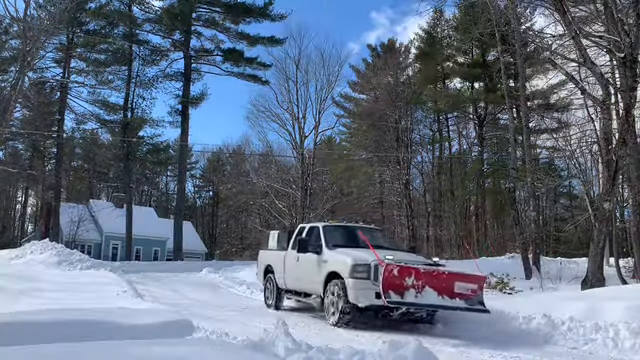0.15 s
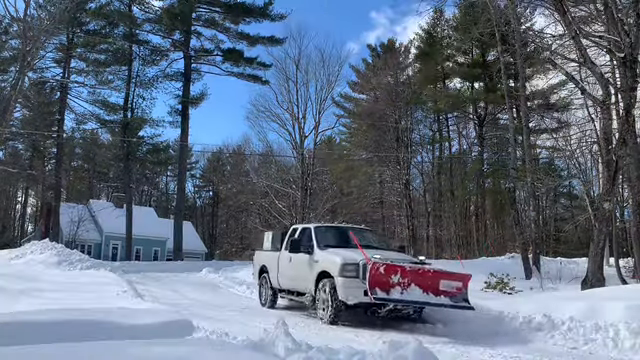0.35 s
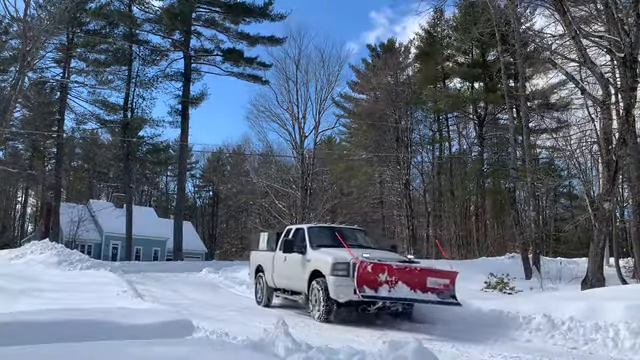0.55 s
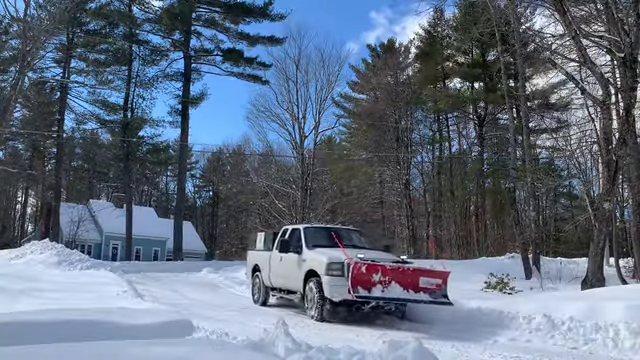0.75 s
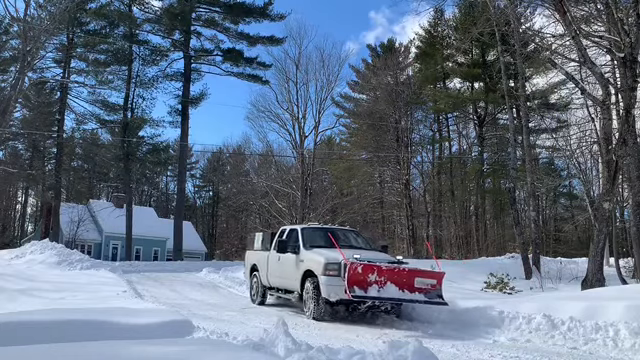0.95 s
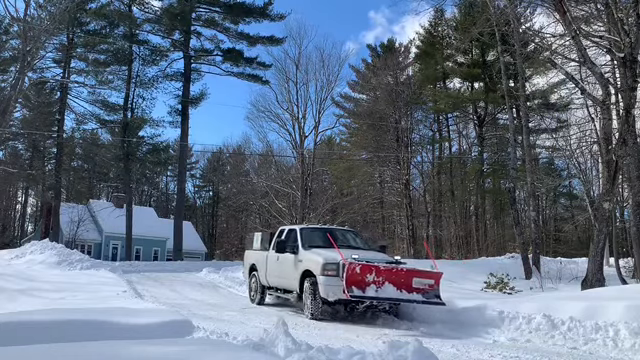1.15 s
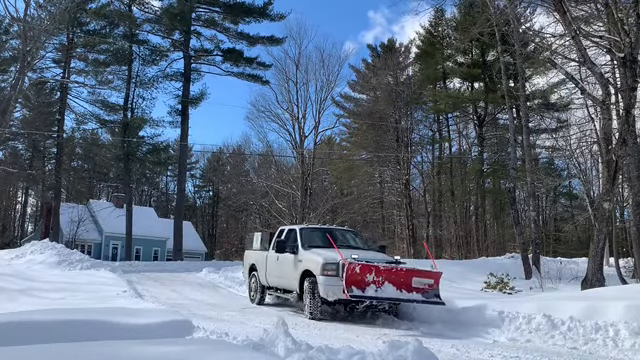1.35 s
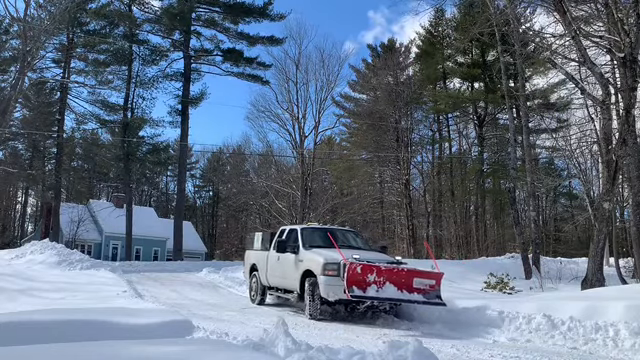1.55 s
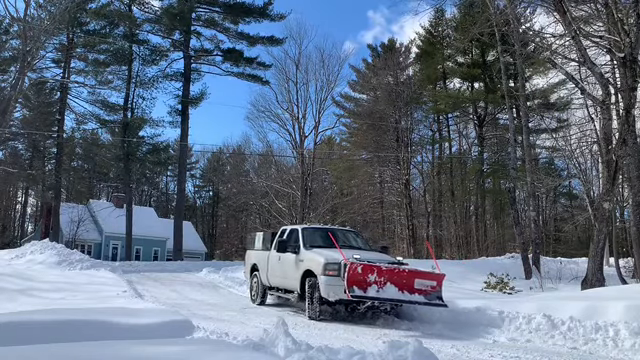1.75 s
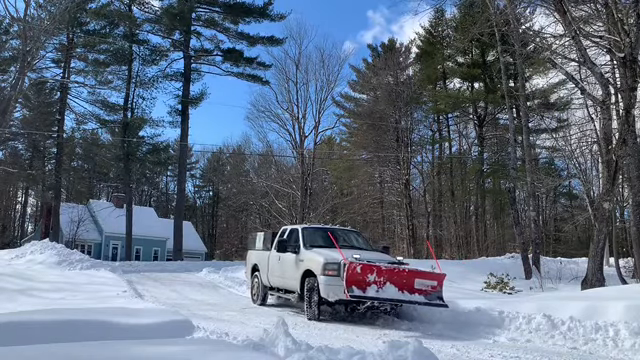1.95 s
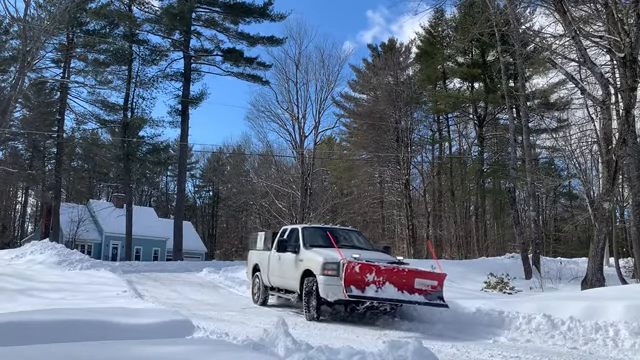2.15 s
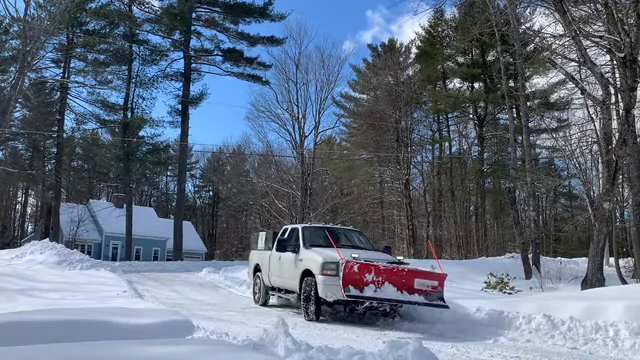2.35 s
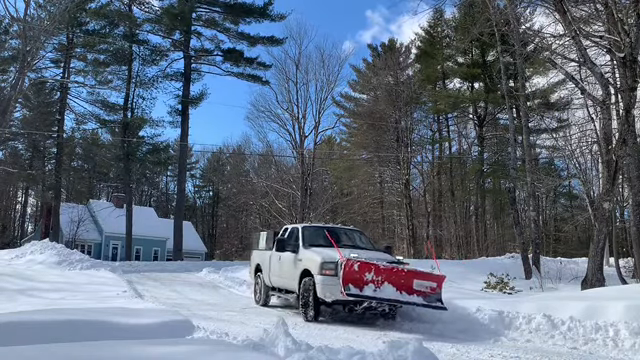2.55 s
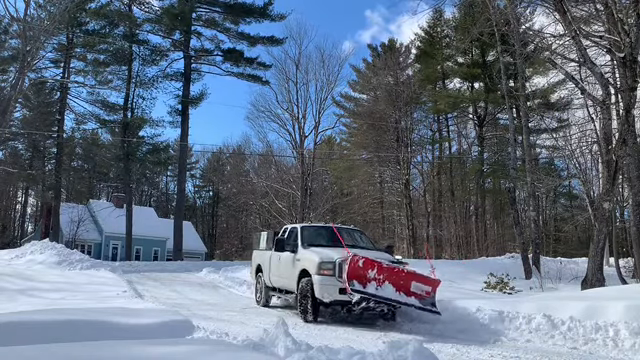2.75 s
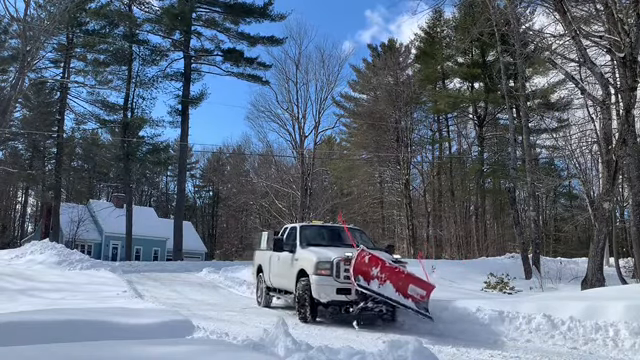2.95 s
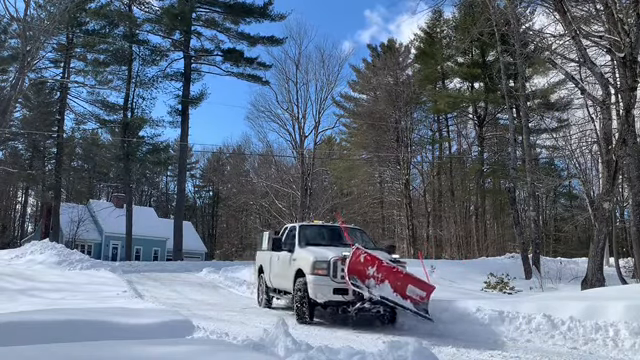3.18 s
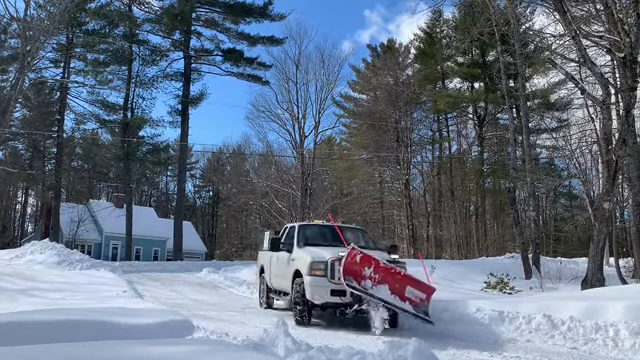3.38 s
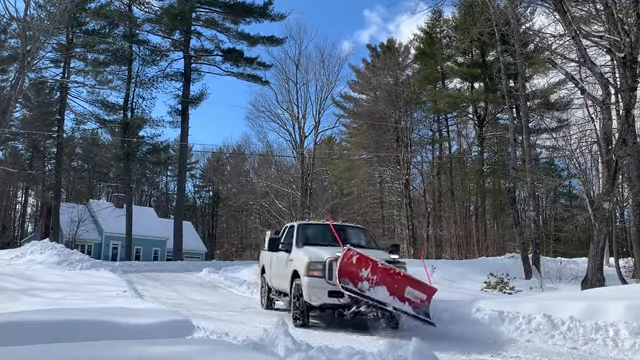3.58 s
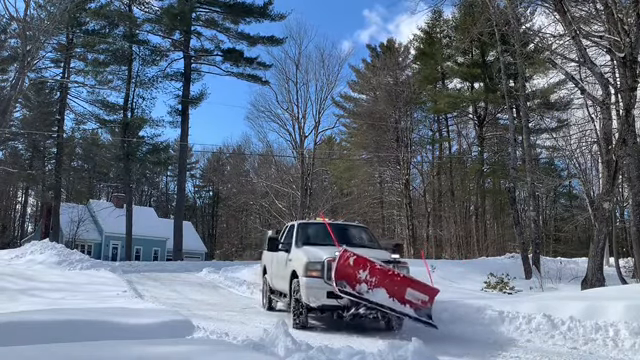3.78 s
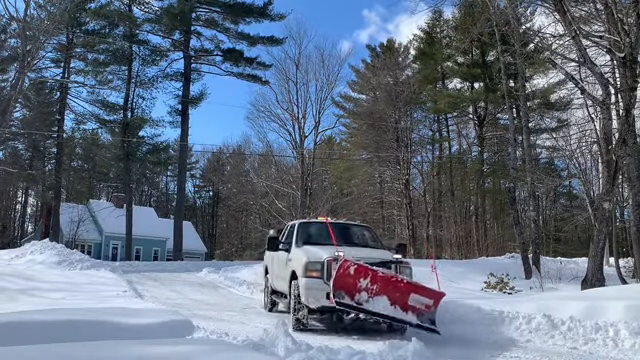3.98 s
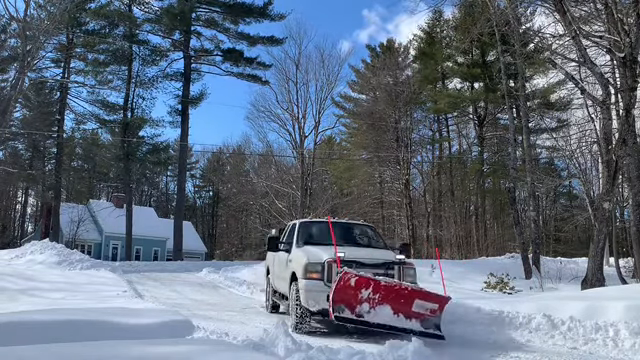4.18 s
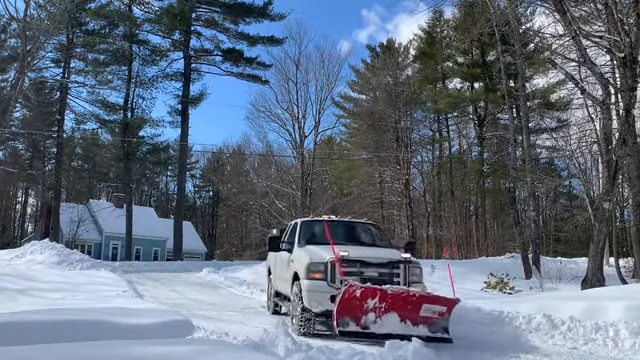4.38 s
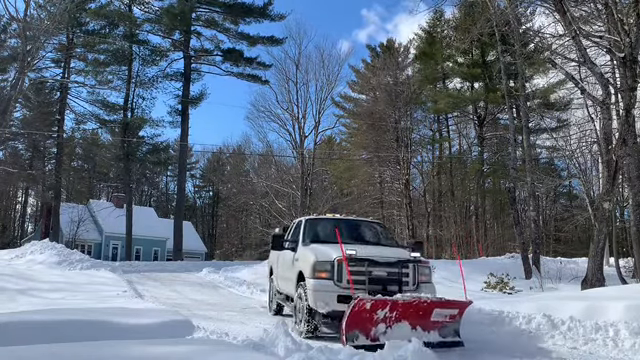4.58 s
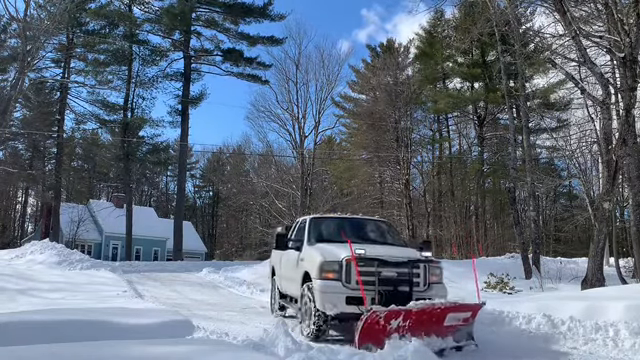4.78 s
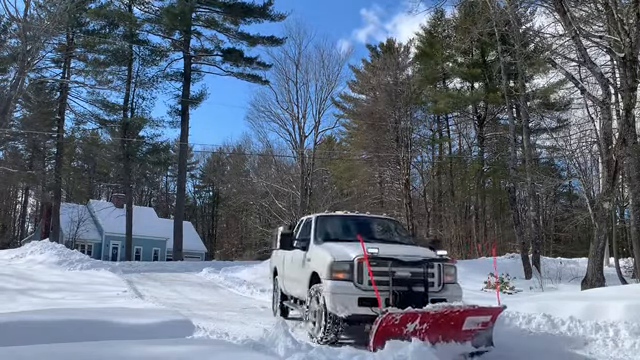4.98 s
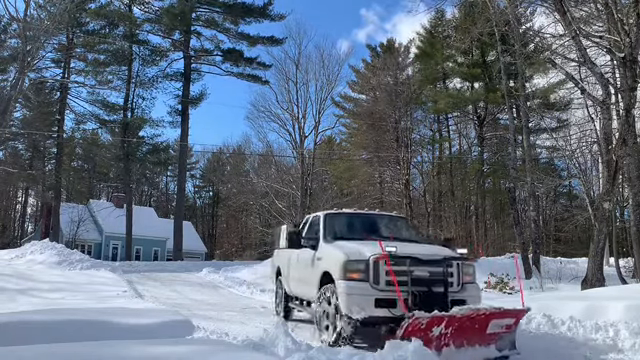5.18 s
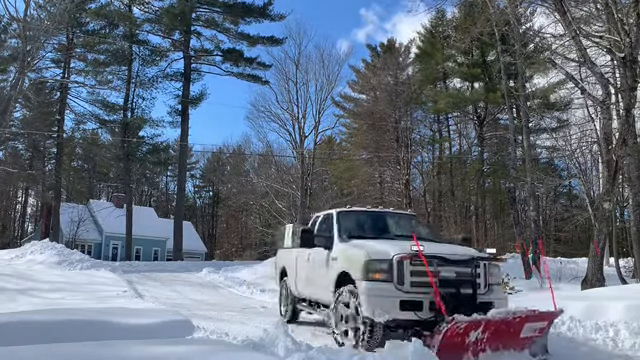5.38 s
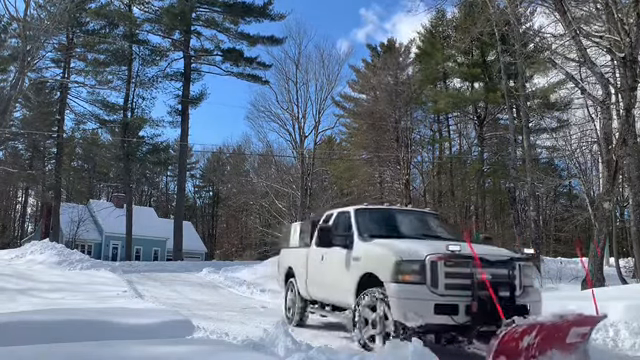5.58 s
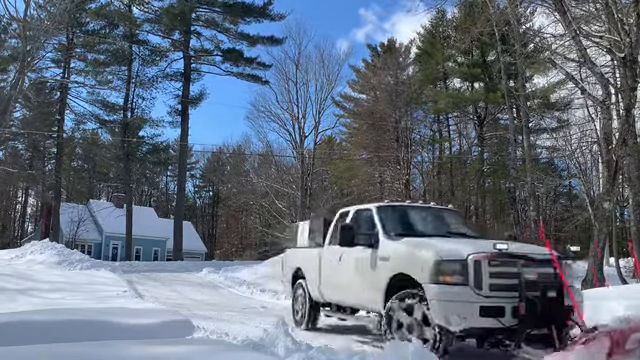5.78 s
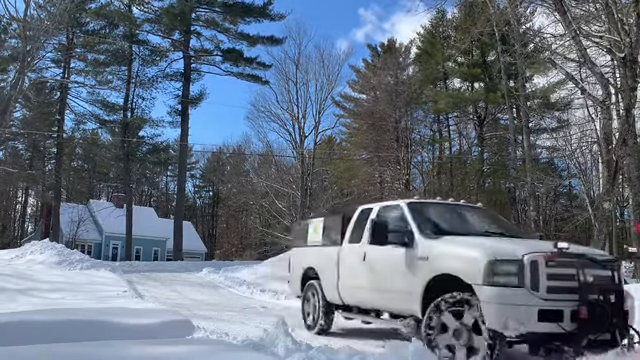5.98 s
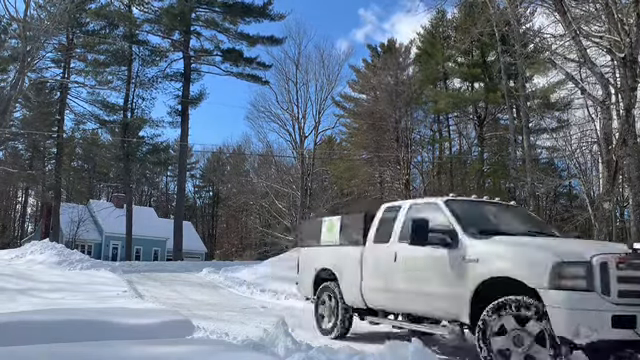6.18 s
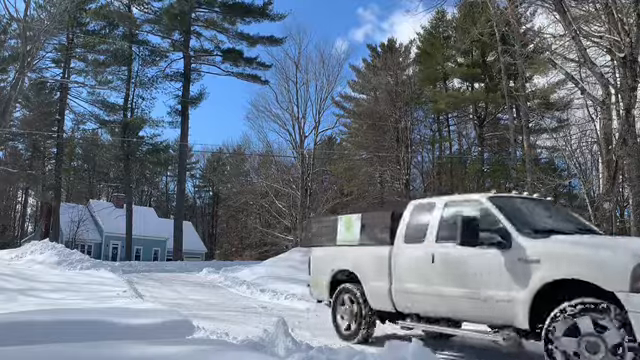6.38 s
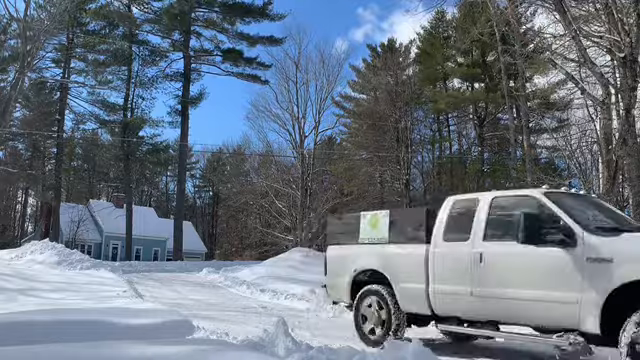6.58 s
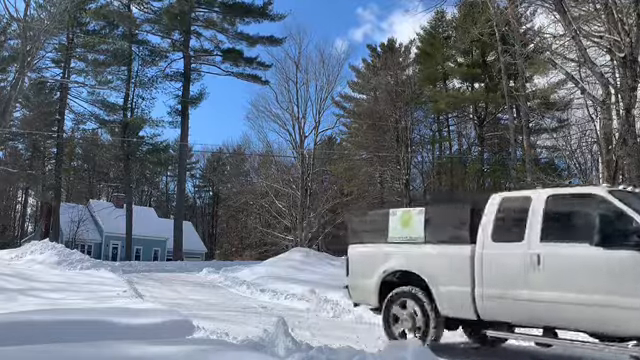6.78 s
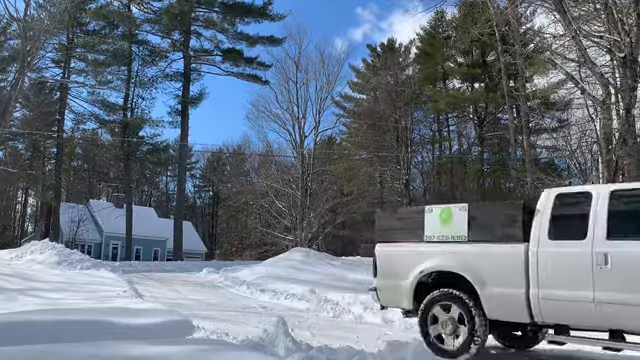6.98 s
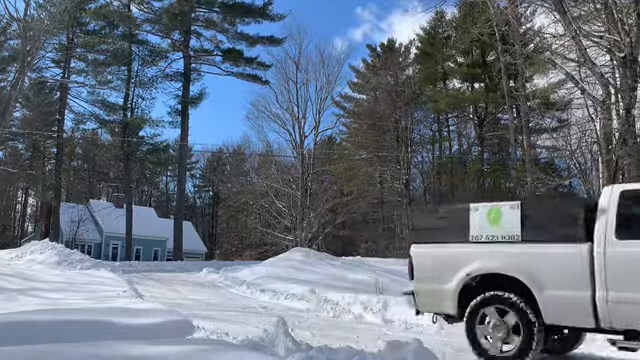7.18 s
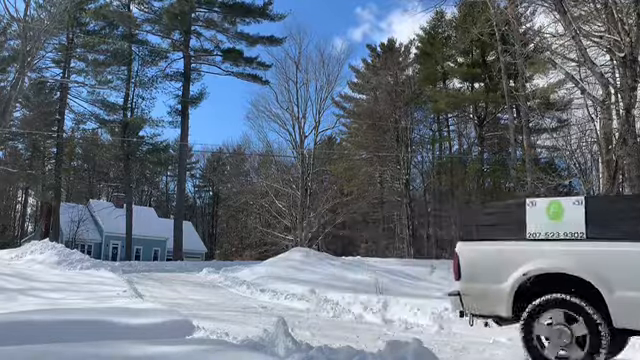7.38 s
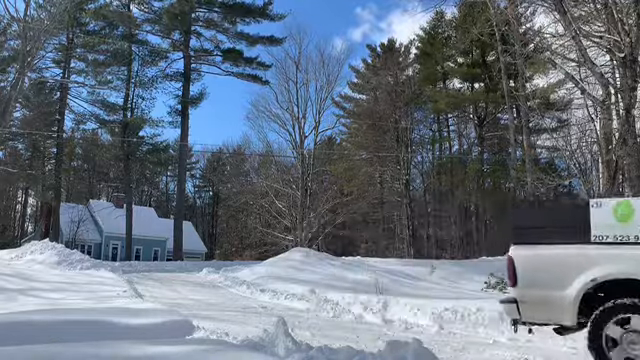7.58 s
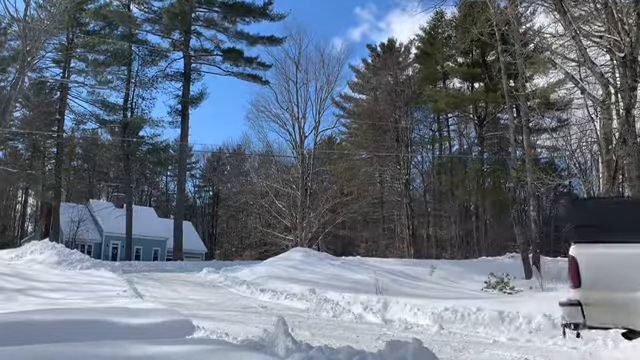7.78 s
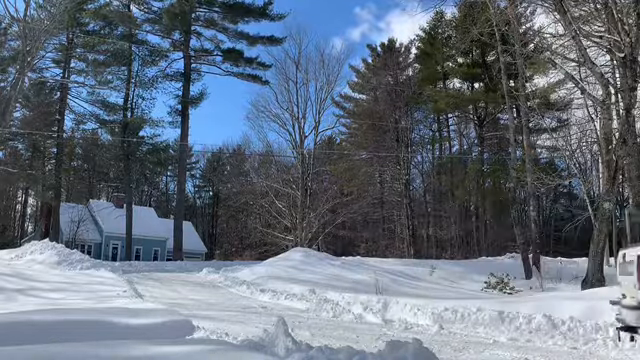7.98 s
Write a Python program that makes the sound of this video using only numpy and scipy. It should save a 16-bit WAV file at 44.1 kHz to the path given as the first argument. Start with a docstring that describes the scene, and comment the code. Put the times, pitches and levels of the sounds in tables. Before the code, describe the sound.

Burbling V8 truck engine, hydraulic plow whine and metal clanks, then a growling rev with scraping blade and breaking snow crust sweeping past rightward.

```python
"""A V8 pickup with a steel plow manoeuvres over packed snow, slows, then revs up and passes close on the right.
The exhaust is engine orders and gas noise ringing a pipe; fan and valve gear are shaped noise.
The plow's frame and blade are struck resonances; its hydraulic pump and relief valve are wavering sines.
Snow crunches, snaps and breaks in slabs, built from random grains and short pitched ticks.
Short rough squeaks and scrapes of snow and steel are resonant grains."""
import sys
import numpy as np
from scipy import signal
from scipy.fft import rfft, irfft
from scipy.io import wavfile
from scipy.ndimage import uniform_filter1d, map_coordinates

SR = 44100
rng = np.random.default_rng(int(sys.argv[2]) if len(sys.argv) > 2 else 0)


def generate_wav(sig):
    """Save sig (samples, or channels by samples) to the path in sys.argv[1] as 16-bit PCM at SR."""
    pcm = np.round(np.clip(np.atleast_2d(sig).T, -1, 1) * 32767).astype(np.int16)
    wavfile.write(sys.argv[1], SR, pcm)


N = 354563
TIME = np.arange(N) / SR  # s
BINS = np.maximum(np.fft.rfftfreq(16384, 1 / SR), 1)  # Hz


def undb(db):
    """Decibels to gain."""
    return 10 ** (np.asarray(db) / 20)


def curves(table):
    """Columns of a table, joined by straight lines in time."""
    s, *columns = np.transpose(table)
    return [np.interp(TIME, s, c) for c in columns]


def ramp(start_s, length_s):
    """Rise from 0 to 1 in a straight line."""
    return np.clip((TIME - start_s) / length_s, 0, 1)


def unit(x):
    """Scale to rms 1."""
    return x / np.sqrt(np.mean(x ** 2))


def steady(x, size=9001):
    """Scale to a running rms of 1; size in samples."""
    power = uniform_filter1d(uniform_filter1d(x ** 2, size), size // 2)
    return x / np.sqrt(power + 1e-12)


def shape(x, gain):
    """Causal minimum-phase filter with the given gain at BINS."""
    cepstrum = irfft(np.log(np.maximum(gain, 1e-5)))
    half = len(cepstrum) // 2
    cepstrum[1:half] *= 2
    cepstrum[half + 1:] = 0
    response = irfft(np.exp(rfft(cepstrum)))[:half]
    return signal.oaconvolve(x, response)[:len(x)]


def colour(points):
    """Gain from (Hz, dB) points, joined on a log frequency axis."""
    hz, db = np.transpose(points)
    return undb(np.interp(np.log(BINS), np.log(hz), db))


def resonances(modes):
    """Gain of overlapping (Hz, width Hz, dB) resonances, summed in power."""
    power = 0
    for hz, width_hz, db in modes:
        detuning = (BINS / hz - hz / BINS) * hz / width_hz
        power = power + undb(db) ** 2 / (1 + detuning ** 2)
    return np.sqrt(power)


def band(low_hz, high_hz, order=8):
    """Gain of a steep band-pass."""
    low_cut = 1 + (low_hz / BINS) ** (2 * order)
    high_cut = 1 + (BINS / high_hz) ** (2 * order)
    return 1 / np.sqrt(low_cut * high_cut)


def walk(rate_hz):
    """Random points joined by lines, rate_hz points per second, spread near 1."""
    return 1.2 * np.interp(TIME * rate_hz, np.arange(4096), rng.standard_normal(4096))


def grains(per_second, spread_db):
    """Random clicks, most small and a few large."""
    size = undb(spread_db * np.minimum(rng.exponential(size=N), 5))
    return unit((rng.random(N) < per_second / SR) * size * rng.standard_normal(N))


def fade(x, seconds):
    """Give each pulse an exponential tail."""
    return signal.lfilter([1], [1, -np.exp(-1 / (seconds * SR))], x)


def bursts(times_s, levels_db, lengths_s, holds_s, rise_s=0.00014):
    """Envelope of blows that each hold, then die by 60 dB in their own time."""
    power = np.zeros(N)
    for s, db, length, hold in np.broadcast(times_s, levels_db, lengths_s, holds_s):
        start = int(s * SR)
        age = TIME[:min(N - start, SR)]
        decay = undb(db - 60 * np.maximum(age - hold, 0) / max(length, .01))
        power[start:start + len(age)] += (decay * (1 - np.exp(-age / rise_s))) ** 2
    return np.sqrt(power)


def delay(x, ms):
    """Delay by a moving time."""
    return map_coordinates(x, [np.arange(N) - ms * SR / 1000], order=3, mode="nearest")


ECHO_TURN_S = 1.3  # half a turn of the blend of two echo patterns


def trees(x, t60_s=0.071):
    """Snow banks and trunks scatter a short, diffuse echo whose pattern shifts steadily."""
    age = TIME[:SR // 6]
    echoes = rng.standard_normal((2, len(age))) * undb(-60 * age / t60_s)
    first, second = (signal.oaconvolve(x, echo / np.linalg.norm(echo))[:N] for echo in echoes)
    turn = np.pi * TIME / ECHO_TURN_S
    return shape(first * np.cos(turn) + second * np.sin(turn), band(380, 6500, order=2))


# Bumps taken by the suspension. Each row: start in seconds, level in dB.
BUMPS = [(2.458, -25), (2.948, -24), (3.803, -25), (4.739, -20), (4.901, -22), (6.211, -26), (6.591, -18),
         (7.204, -15.5)]
THUMP_S = 0.39  # time to die by 60 dB


def suspension():
    """Bumps drum the truck's body: low noise bursts."""
    s, db = np.transpose(BUMPS)
    drum = steady(shape(rng.standard_normal(N), band(191, 321, order=5)), size=1501)
    return drum * bursts(s, db, THUMP_S, 0, rise_s=0.0041)


# Short rough squeaks and scrapes of snow and plow steel. Each row: centre in seconds, length in seconds,
# pitch in Hz, resonance width in Hz before squaring, level in dB.
SQUEAKS = [(0.3, 0.05, 2800, 2590, -56.5), (0.387, 0.052, 1550, 500, -52), (0.464, 0.05, 1500, 1500, -60),
           (0.557, 0.038, 1600, 900, -61), (0.672, 0.035, 4960, 2600, -51),
           (0.696, 0.052, 2180, 700, -52.5), (0.86, 0.027, 2000, 1800, -67), (1.245, 0.04, 3500, 4020, -59),
           (1.314, 0.086, 1370, 1500, -55), (2.475, 0.03, 4700, 1500, -45), (2.934, 0.043, 5400, 1500, -34),
           (5.656, 0.16, 6060, 800, -38.5), (5.83, 0.12, 5700, 710, -34), (6.11, 0.15, 5430, 510, -42.5)]


def squeaks():
    """Short rough squeaks and scrapes of snow and plow steel: resonant grains under a bell envelope."""
    out = np.zeros(N)
    for s, length_s, hz, width_hz, db in SQUEAKS:
        squeak = unit(shape(grains(1000, 2.5), resonances([(hz, width_hz, 0)]) ** 2))
        out += squeak * undb(db) * np.exp(-(2 * (TIME - s) / length_s) ** 2)
    return out


# Tone of the snow noise as heard. Each row: frequency in Hz, gain in dB.
SNOW_TONE = [(300, 0), (450, 4), (800, 3), (1080, -3), (1480, 5), (1850, -1), (2300, 3), (3500, 0),
             (6300, 1.5), (8300, -4), (11000, -1.5), (13500, -10), (16000, -8)]
# Grain sizes of packed snow. Each row: lowest Hz, highest Hz, grains per second.
GRAIN_SIZES = [(300, 1500, 350), (1500, 3200, 300), (3200, 6800, 600), (6800, 17000, 4500)]
CLUMP_DB, CLUMP_NEAR_DB = 1.2, .6  # unevenness at reference distance, added per halving of distance


def crunch(nearness):
    """Packed snow breaks in clumps of grains, each size flickering on its own."""
    clumps_db = (CLUMP_DB + CLUMP_NEAR_DB * nearness) * walk(22)
    out = np.zeros(N)
    for low_hz, high_hz, per_second in GRAIN_SIZES:
        envelope = fade(grains(per_second, 2.2) ** 2, .0006) ** .5
        crumbs = unit(envelope * rng.standard_normal(N))
        flicker = undb(clumps_db + 2.9 * walk(70))
        out += shape(crumbs * flicker, colour(SNOW_TONE) * band(low_hz, high_hz, order=4))
    return unit(out)


CRACKLES_PER_S, CRACKLE_S = 30, .004


def crackle():
    """Bits of frozen crust give way one by one, each with a short broad crack."""
    size = undb(3 * np.minimum(rng.exponential(size=N), 2.5))
    breaks = fade((rng.random(N) < CRACKLES_PER_S / SR) * size, CRACKLE_S)
    return unit(shape(breaks * rng.standard_normal(N), colour(SNOW_TONE) * band(550, 6500, order=2)))


SNAP_RING_S, SNAP_SPREAD_DB = .0026, 2.6


def snaps(per_second, low_hz, high_hz, ring_s=SNAP_RING_S):
    """Lumps of cold snow snap with brief decaying sines, each at its own pitch."""
    when, pitch, size = rng.random((int(per_second * TIME[-1]), 3)).T[:, :, None]
    age = TIME[:int(4 * ring_s * SR)]
    hz = low_hz * (high_hz / low_hz) ** pitch
    gain = undb(SNAP_SPREAD_DB * np.minimum(-np.log(1 - size), 3))
    ticks = np.sin(2 * np.pi * hz * age) * np.exp(-age / ring_s) * gain
    at = (when * N).astype(int) + np.arange(len(age))
    return unit(np.bincount(at.ravel(), ticks.ravel(), N)[:N])


SNAPS_PER_S, SNAP_DB, CRACKLE_DB = 260, -4, -2.5  # levels against the crunch
SNOW_DB, SNOW_NEAR_DB = -66.5, 7  # crunch at 1 m/s and reference distance, per halving of distance
BLADE_DOWN_S, BLADE_BITE_S = 4.7, 0.15
BLADE_DB = -4.5  # change of the snow bed's level once the blade is down


def snow_bed(nearness, rolling_mps):
    """Snow breaks all along the truck, in two independent, partly blended layers; louder fast and near."""
    db = SNOW_DB + 20 * np.log10(np.abs(rolling_mps)) + SNOW_NEAR_DB * nearness
    db = db + BLADE_DB * ramp(BLADE_DOWN_S, BLADE_BITE_S)
    layers = []
    for _ in range(2):
        ticks = undb(SNAP_DB) * snaps(SNAPS_PER_S, 1500, 7000)
        layers.append(crunch(nearness) + ticks + undb(CRACKLE_DB) * crackle())
    front, rear = layers
    return np.array([front + .3 * rear, rear + .3 * front]) * undb(db)


# Level of the stamped snow. Each row: time in seconds, level in dB.
TREAD_LEVEL_DB = [(0, -53.5), (.9, -66), (1.3, -56), (2.2, -67), (3, -64), (4.3, -63), (5.2, -54),
                  (5.8, -42), (6.4, -39.5), (7.05, -39), (7.35, -40.5), (8.04, -41)]
# Hollow note of the stamped snow, before levelling. Each row: frequency in Hz, gain in dB.
TREAD_COLOUR = [(450, -6.5), (620, 0), (800, 8.5), (930, 4), (1100, -12), (1450, -2.5), (1650, -3),
                (1900, -14), (2300, -5), (3200, -9.5)]
TREAD_LUMPS_PER_S, TREAD_RING_S = 130, .006


def treads():
    """Tread blocks crush lumps of packed snow with small hollow knocks of uneven strength."""
    db, = curves(TREAD_LEVEL_DB)
    knocks = snaps(TREAD_LUMPS_PER_S, 500, 3000, TREAD_RING_S)
    ticks = snaps(4 * TREAD_LUMPS_PER_S, 500, 3000)
    hollow = shape(knocks + ticks, colour(TREAD_COLOUR))
    return unit(hollow * undb(2.5 * walk(25))) * undb(db)


# Breaking slabs of crust. Each row: start in seconds, level in dB before the mix, icy tick share in dB
# before the mix, hollow body share in dB, grinding time in seconds.
SLAB_BREAKS = [(2.923, -37, -27, -16, 0.038), (3.745, -46.5, -6, -8, 0.019), (4.747, -29, -14, 1, 0.006),
               (4.794, -30, -9, -15, 0.0047), (4.885, -25.5, -14, 2.5, 0.0052), (4.98, -28, -21, -5, 0.004),
               (5.066, -38, -18, -20, 0.0036), (5.437, -33, -1, -16, 0.01),
               (5.509, -26.5, -15, -12, 0.0048), (5.548, -34, -24, -23, 0.014),
               (5.668, -45, -25, -22, 0.0044), (5.765, -28.5, -25, -19, 0.0049),
               (5.795, -34, -25, -3, 0.018), (5.8405, -26.5, -29, -20, 0.0046), (6.47, -36, -11, 5, 0.033),
               (6.549, -33, -16, 1, 0.022), (6.578, -29, -22, -12, 0.011), (6.644, -34, -5.5, -14, 0.0035),
               (6.6984, -30, -15, -7, 0.02), (6.8013, -33, -4, -18, 0.037), (6.943, -36, -4, -13, .005),
               (6.982, -27.5, -31, 4, 0.0058), (7.013, -29, -20, 5, 0.017), (7.075, -37, -20, 13, 0.007),
               (7.189, -25, -5.5, 3.5, 0.045), (7.41, -31, -32, 1, .014), (7.459, -34, -20, 11, 0.0051),
               (7.498, -29.5, -11, 6, 0.0077), (7.607, -23.5, -13, 2.5, 0.0055), (7.627, -28, -22, 3, 0.03),
               (7.669, -26.5, -10, 0, 0.029), (7.745, -34, -7, 2, 0.029), (7.928, -42, -3.5, -5, 0.0039),
               (7.974, -34.5, -23, 4.5, 0.033)]
# Hollow mid-range peaks heard in the breaks. Each row: frequency in Hz, width in Hz, gain in dB.
HOLLOW_PEAKS = [(820, 63, -3), (1443, 37, 4), (1644, 28, 4.5), (2080, 170, -2.5)]
CRUMBLE_S, CRUMBLE_GROWTH = 0.098, 4.8  # 60 dB decay, added seconds per second of grinding
SLAB_SNAPS_PER_S = 1100


def crust():
    """Slabs of crust snap with a short icy tick, grind for a moment and crumble into lumps and powder."""
    s, db, top_db, body_db, hold_s = np.transpose(SLAB_BREAKS)
    length_s = CRUMBLE_S + CRUMBLE_GROWTH * hold_s
    powder = unit(shape(grains(3000, 1.5), colour(SNOW_TONE) * band(3500, 16700, order=2)))
    crumble = steady(snaps(SLAB_SNAPS_PER_S, 2400, 7500) + undb(-2) * powder, size=1501)
    body = steady(shape(grains(1500, 1.2), resonances(HOLLOW_PEAKS) * band(490, 2400, order=4)))
    tick = unit(shape(rng.standard_normal(N), band(4000, 12000, order=2)))
    grinding = crumble * bursts(s, db, length_s, hold_s, rise_s=.0007)
    grinding += body * bursts(s, db + body_db, length_s, hold_s, rise_s=.0012)
    return undb(-2.5) * grinding + undb(8.5) * tick * bursts(s, db + top_db, 0.081, 0)


# Relief valve, singing at the end of the blade's swing. Each row: time in seconds, pitch in Hz, level in dB.
VALVE = [(2.96, 945, -74), (3, 932, -43), (3.04, 902, -38), (3.09, 872, -39), (3.145, 880, -41),
         (3.18, 900, -56), (3.22, 900, -85)]


def valve():
    """Oil forced through the relief valve sings one sagging, wavering note."""
    hz, db = curves(VALVE)
    phase = 2 * np.pi * np.cumsum(hz * (1 + .006 * walk(120))) / SR
    sounding = (TIME > VALVE[0][0]) * (TIME < VALVE[-1][0])
    return np.sin(phase) * undb(db + 0.77 * walk(45)) * sounding


# Pump speed. Each row: time in seconds, pitch in Hz.
PUMP_SPEED_HZ = [(2.44, 470), (2.5, 595), (2.6, 765), (2.68, 808), (2.8, 837), (2.9, 857)]
# Pump partials. Each row: multiple of the pitch, dB while spinning up, dB at full speed.
PUMP_PARTIALS = [(1, -51, -52), (1.64, -56, -63), (2, -68, -45), (3, -76, -68), (4, -76, -60.5),
                 (5, -65, -58), (6, -70, -62)]
PUMP_LOADED_HZ = (795, 828)  # pitch range over which the partials change level
PUMP_ON_S, PUMP_OFF_S, PUMP_FADE_S = 2.44, 2.92, 0.051


def pump():
    """The electric pump spins up while the blade swings; its partials shift in level near full speed."""
    hz, = curves(PUMP_SPEED_HZ)
    phase = 2 * np.pi * np.cumsum(hz * (1 + .002 * walk(120))) / SR
    full = np.interp(hz, PUMP_LOADED_HZ, [0, 1])
    tone = np.zeros(N)
    for k, slow_db, fast_db in PUMP_PARTIALS:
        db = slow_db + (fast_db - slow_db) * full + 1.5 * walk(40)
        tone += np.sin(k * phase) * undb(db)
    return tone * ramp(PUMP_ON_S, 0.068) * np.exp(-np.maximum(TIME - PUMP_OFF_S, 0) / PUMP_FADE_S)


# Steel resonances of frame and blade. Each row: frequency in Hz, width in Hz, gain in dB.
FRAME_MODES = [(540, 190, -0.5), (632, 270, -0.5), (775, 260, 2), (880, 23, 6.5)]
BLADE_MODES = [(1235, 56, 1.5), (1397, 46, 5.5), (1604, 29, 0), (2030, 52, -7.5), (2247, 40, 2.5),
               (2530, 110, -5.5)]
DRAG_DB, DRAG_NEAR_DB = -47, 2.5  # at reference distance, per halving of distance
DRAG_UNEVEN_DB, DRAG_CATCH_PER_S = 3.5, 20


def drag(nearness):
    """The lowered blade catches unevenly on the ground, grinding its frame and face."""
    gain = resonances(FRAME_MODES + BLADE_MODES) * band(430, 3800, order=4)
    grind = unit(shape(grains(900, 1.0), gain))
    db = DRAG_DB + DRAG_NEAR_DB * nearness + DRAG_UNEVEN_DB * walk(DRAG_CATCH_PER_S)
    return grind * undb(db) * ramp(BLADE_DOWN_S, BLADE_BITE_S)


STRIKE_DETUNE, STRIKE_SPREAD_DB = .03, 2.5  # each blow's random spread of mode pitch (share) and strength


def struck(modes, passband, times_s, levels_db, lengths_s, strike_db=3.0, rattle_db=0.0):
    """Each blow rings a steel part with its own mix of modes while its loose pins rattle."""
    out, size = np.zeros(N + SR), SR // 2
    age, pins = TIME[:size], grains(2200, 1.2)
    for s, db, length_s in zip(times_s, levels_db, lengths_s):
        chance = rng.standard_normal((len(modes), 2))
        varied = [(hz * (1 + STRIKE_DETUNE * a), width_hz, mode_db + STRIKE_SPREAD_DB * b)
                  for (hz, width_hz, mode_db), (a, b) in zip(modes, chance)]
        ring = shape(signal.unit_impulse(size), passband * resonances(varied))
        start = int(s * SR)
        rattle = unit(signal.fftconvolve(pins[start:start + size], ring)[:size])
        rattle = rattle * undb(-60 * age / length_s)
        strike = undb(db + strike_db) * ring / np.abs(ring).max()
        out[start:start + size] += strike + undb(db + rattle_db) * rattle
    return out[:N]


# Blows of the plow frame. Each row: start in seconds, knock gain in dB before the strike boost,
# blade ring share in dB, rattle's 60 dB decay in seconds.
CLANKS = [(0.85, -40.5, -12, 0.11), (1.718, -55, -2, 0.094), (2.148, -41.5, -11, .12),
          (2.44, -34, -12, 0.19), (2.474, -43, -5.5, 0.36), (2.893, -36.5, 1, 0.26),
          (2.932, -34.5, -3, 0.19), (2.964, -36.5, 1, 0.19), (2.99, -43.5, 5, 0.39), (3.071, -23.5, -5, .1),
          (3.468, -46, -7, .12), (3.729, -34.5, -3.5, 0.24), (3.806, -32.5, -8.5, 0.12),
          (3.851, -40, -6, 0.19), (3.895, -41.5, -7, 0.13), (3.921, -43, -3.5, 0.2),
          (3.976, -41.5, -12, 0.12), (4.028, -37, -10, 0.12), (4.061, -41, -13, 0.088),
          (4.572, -35, -6, 0.068), (4.725, -25, -8, 0.21), (4.746, -37, 12, 0.33), (4.795, -29, 3, 0.18),
          (4.81, -41, 5, 0.19), (4.837, -26, -1, 0.22), (4.885, -28.5, -2, 0.24), (4.899, -36, 6.5, 0.28),
          (4.984, -30.5, -3, 0.2), (5.417, -35, -0.5, 0.33), (5.769, -33.5, -4, 0.37),
          (6.069, -22.5, -2, 0.15), (6.343, -34, 3, 0.21), (6.58, -23, -2.5, 0.14), (6.716, -24, 2.5, 0.11)]
# Bright ring of the cutting edge. Each row: frequency in Hz, width in Hz, gain in dB.
EDGE_MODES = [(3580, 340, -4.5), (4360, 130, 1), (4870, 160, -1), (5450, 150, -3), (6540, 500, -2.5)]
REBOUND_S, REBOUND_DB = 0.025, -21.5  # slack in the mount lets each blow land again
SCRAPE_DB, SCRAPE_PER_RING = -8.5, 1  # scrape share, and its dB per dB of ring share


def plow():
    """A blow knocks the frame, rings the blade and rebounds once; a bright scrape follows the ring share."""
    blows = np.array(CLANKS)
    rebounds = blows + [REBOUND_S, REBOUND_DB, 0, 0]
    s, db, ring_db, length_s = np.vstack([blows, rebounds]).T
    frame = struck(FRAME_MODES, band(496, 930, order=4), s, db, length_s)
    blade = struck(BLADE_MODES, band(1280, 2440, order=4), s, db + ring_db, length_s)
    scrape = unit(shape(grains(1200, 1.0), resonances(EDGE_MODES) * band(2900, 9600, order=3)))
    scrape_db = db + SCRAPE_DB + SCRAPE_PER_RING * ring_db
    return frame + blade + scrape * bursts(s, scrape_db, length_s, 0, rise_s=0.00106)


IDLE_HZ = 6  # four-stroke cycles per second


def loudness(law, cycle_hz, nearness, size=13001):
    """Gain of an engine voice from its speed, its rate of revving up and its nearness."""
    idle_db, speed_db, revving_db, near_db = law
    octaves = np.log2(cycle_hz / IDLE_HZ)
    revving = uniform_filter1d(np.gradient(octaves) * SR, size)
    return undb(idle_db + speed_db * octaves + revving_db * revving + near_db * nearness)


# Spectrum of fan and valve gear, before levelling. Each row: frequency in Hz, gain in dB.
WHIRR_COLOUR = [(250, -12), (450, -3), (600, -1.5), (820, 1.5), (1080, -7), (1250, -5.5), (1420, -4.5),
                (1600, -6.5), (1850, -11), (2300, -9.5), (3200, -17), (4500, -15.5), (6500, -23),
                (8500, -35), (16000, -46)]
# Whirr loudness, before hiding. Columns: dB at idle and reference distance, dB per doubling of speed,
# dB per doubling a second of revving up, dB per halving of distance.
WHIRR_LAW = (-51.5, 4.5, 0, 11)
HIDDEN_S, HIDING_S, HIDDEN_DB = 6.1, 0.61, -1.5  # the body hides the engine bay once the bonnet has gone by


def engine_bay(pulses, cycle_hz, nearness):
    """Fluttering fan rush and valve clatter: noise, and noise gated by each firing."""
    puffs = fade(pulses, 0.0049)
    fan = rng.standard_normal(N) * undb(1.2 * walk(16))
    valves = unit(puffs * rng.standard_normal(N))
    whirr = unit(shape(fan + undb(-7) * valves, colour(WHIRR_COLOUR)))
    hidden = undb(HIDDEN_DB * ramp(HIDDEN_S, HIDING_S))
    return whirr * loudness(WHIRR_LAW, cycle_hz, nearness) * hidden


def firings(cycle_hz, weak_bank_db=-12, bank_lag=0.21, scatter_db=1.0, jitter=0.048):
    """One pulse per cylinder; the far bank is weaker and later (lag in firings), so the V8 burbles."""
    count = np.cumsum(8 * cycle_hz) / SR
    k = np.arange(int(count[-1]))
    far = np.array([0, 1, 1, 0, 1, 0, 0, 1])[k % 8]
    chance = rng.standard_normal((len(k), 2))
    at = np.interp(k + bank_lag * far + jitter * chance[:, 0], count, np.arange(N))
    return np.bincount(at.astype(int), undb(weak_bank_db * far + scatter_db * chance[:, 1]), N)


# What the two uneven banks put into the pipe. Each row: multiple of the cycle rate, mean level in dB.
ORDERS = [(5, -1.5), (6, -20), (7, -12), (8, 0), (10, -5), (11, 0.5), (13, 3), (15, -3), (16, 4.5),
          (18, -3), (19, -5), (21, 2), (22, -4), (23, -12.5), (24, -0.5), (26, -7), (27, 2.5), (28, -7.5),
          (29, -7.5), (30, -3.5), (32, -1), (34, -5), (35, -4), (37, -6), (39, -6), (40, -5), (48, -9)]
OTHER_ORDERS_DB, ORDER_WAVER_DB = -11, 2


def pipe_pressure(cycle_hz, count=52):
    """The repeating firing pattern as sines at multiples of the cycle rate, each wavering a little."""
    turns = np.cumsum(cycle_hz) / SR
    strength_db = {round(k): db for k, db in ORDERS}
    pressure = np.zeros(N)
    for k in range(5, count):
        db = strength_db.get(k, OTHER_ORDERS_DB) + ORDER_WAVER_DB * walk(6)
        pressure += np.sin(2 * np.pi * (k * turns + rng.random())) * undb(db)
    return pressure


# Exhaust resonances, before levelling; the rasp is the tailpipe's mouth.
# Each row: frequency in Hz, width in Hz, gain in dB.
BOOM_MODES = [(50.3, 9.3, -2), (76, 7.8, -8.5)]
DRONE_MODES = [(102.6, 8.8, 2.5), (121, 16, 2), (137.1, 7.3, 8)]
BARK_MODES = [(178, 21, 4.5), (234.1, 17.7, 5), (297, 31, 3), (328.3, 10, 5.5), (362.7, 17, -1.5),
              (498, 20, -3)]
RASP_MODES = [(362, 12.7, 11), (421, 34, -16), (420, 28, -6)]
# Loudness of the voices. Columns: dB at idle and reference distance, dB per doubling of speed,
# dB per doubling a second of revving up, dB per halving of distance.
BOOM_LAW = (-40, 21.5, 4, 4)
BARK_LAW = (-38, 9.5, 2, 6.5)
RASP_LAW = (-56.5, 0, -4, 16.5)
# Drone level, standing for engine orders that meet the pipe's resonance.
# Each row: time in seconds, level in dB.
DRONE_LEVEL_DB = [(0, -25), (.42, -44), (.85, -30.5), (1.05, -43), (1.6, -36.5), (2.15, -42.5),
                  (2.95, -23.5), (3.42, -23.5), (3.85, -35), (4.32, -36.5), (4.63, -26), (5.02, -20.5),
                  (5.5, -23.5), (6.25, -22.5), (6.72, -16.5), (7.2, -18.5), (7.5, -20.5), (8.04, -24)]
BOOM_GAS_DB, DRONE_GAS_DB, BARK_GAS_DB = -7, -7, 1  # gas against pressure at idle
GAS_DB_PER_HZ = -1.7  # per Hz of cycle rate


def exhaust(pulses, cycle_hz, nearness):
    """Firing pressure and turbulent gas ring the pipe; the gas share grows towards idle."""
    pressure, gas = pipe_pressure(cycle_hz), rng.standard_normal(N)

    def voice(gain, gas_db, size=9001):
        """One group of pipe resonances, at a steady level."""
        share = undb(gas_db + GAS_DB_PER_HZ * (cycle_hz - IDLE_HZ))
        tone = steady(shape(pressure, gain), size)
        rush = steady(shape(gas, gain), size)
        return (tone + share * rush) / np.hypot(1, share)

    boom = voice(resonances(BOOM_MODES) * band(39.0, 89.8), BOOM_GAS_DB)
    drone = voice(resonances(DRONE_MODES) * band(89, 146, order=12), DRONE_GAS_DB)
    bark = voice(resonances(BARK_MODES) * band(210.5, 426), BARK_GAS_DB, size=17001)
    rasp = steady(shape(unit(pulses) + gas, resonances(RASP_MODES) * band(393, 468)))
    drone_db, = curves(DRONE_LEVEL_DB)
    out = drone * undb(drone_db)
    for sound, law in [(boom, BOOM_LAW), (bark, BARK_LAW), (rasp, RASP_LAW)]:
        out += sound * loudness(law, cycle_hz, nearness)
    return out


# Engine speed. Each row: time in seconds, four-stroke cycles per second (eight firings each).
CYCLE_HZ = [(0, 8.7), (.2, 8.3), (.65, 6.5), (1, 5.87), (1.3, 6.1), (1.65, 6.65), (2.25, 5.85), (2.5, 6.3),
            (3.1, 8.35), (3.33, 8.62), (3.5, 8.35), (3.82, 6.5), (4.35, 5.7), (4.5, 6.3), (4.7, 7.9),
            (5.05, 9.6), (5.22, 9.8), (5.52, 8.85), (5.76, 8.64), (6.2, 10.07), (6.52, 10.72),
            (6.88, 10.87), (7.24, 10.42), (7.58, 7.55), (8.04, 7.02)]
# Truck's path. Each row: time in seconds, distance in metres.
DISTANCE_M = [(0, 12.7), (1, 12.1), (2.2, 13.5), (3, 8.65), (4.3, 12.1), (5, 8.1), (6, 5.85), (7, 4.09),
              (8.04, 3.37)]
# Rolling over the snow. Each row: time in seconds, speed in m/s.
ROLLING_MPS = [(0, 0.78), (1, 0.28), (1.75, 0.74), (2.4, 0.34), (2.7, 1.7), (3.1, 2.2), (3.6, 0.66),
               (4.45, 1.07), (4.9, 6.6), (6.2, 6.5), (6.8, 11.2), (8.04, 5.4)]
# Bearing. Each row: time in seconds, delay of the left port in ms above the bass.
LEFT_LAG_MS = [(0, -0.073), (4.5, -0.075), (5.5, 0.066), (6.25, 0.12), (6.75, 0.265), (8, 0.34)]
REFERENCE_M = 10
BASS_LAG_RATIO = 1.82  # long waves bend round the phone and lag more


def scene():
    """Engine speed, rolling and distance set levels; the lag between two ports moves the truck rightward."""
    cycle_hz, = curves(CYCLE_HZ)
    metres, = curves(DISTANCE_M)
    rolling_mps, = curves(ROLLING_MPS)
    lag_ms, = curves(LEFT_LAG_MS)
    nearness = np.log2(REFERENCE_M / metres)  # halvings of distance
    snow = snow_bed(nearness, rolling_mps)
    work = plow() + drag(nearness) + squeaks() + treads()
    slabs, hydraulics = crust(), pump() + valve()
    pulses = firings(cycle_hz)
    whirr = engine_bay(pulses, cycle_hz, nearness)
    bass = exhaust(pulses, cycle_hz, nearness) + suspension()
    upper = whirr + work + slabs + hydraulics
    left = delay(bass, BASS_LAG_RATIO * lag_ms) + delay(upper, lag_ms)
    right = bass + upper
    scattered = undb(-1) * whirr + undb(-4) * work + undb(-8) * (slabs + hydraulics)
    truck = np.array([left + trees(scattered), right + trees(scattered)])
    facing = undb([[-.25], [.25]])  # left, right
    return facing * (truck + snow)


TOP_HZ = 15900


def record(dry):
    """The phone cuts the top: steep elliptic low-pass."""
    return signal.sosfilt(signal.ellip(10, .2, 80, TOP_HZ, fs=SR, output="sos"), dry)


dry = scene()
out = record(dry)
generate_wav(out)
```